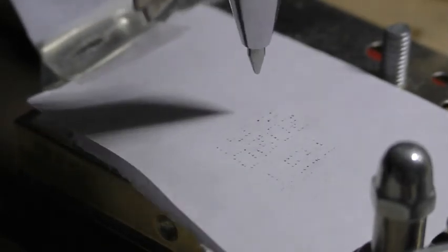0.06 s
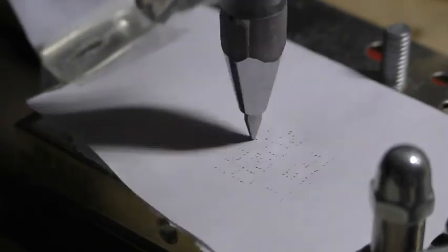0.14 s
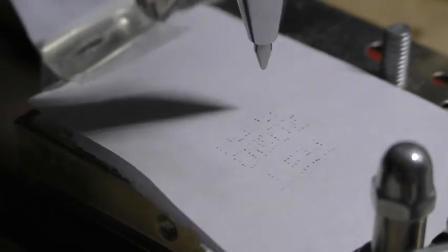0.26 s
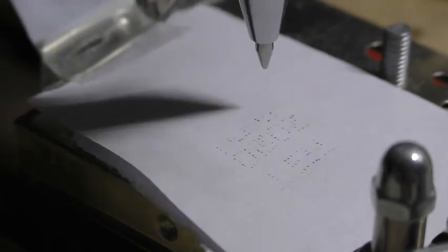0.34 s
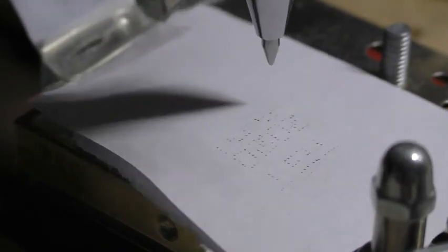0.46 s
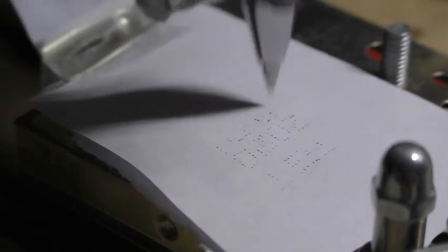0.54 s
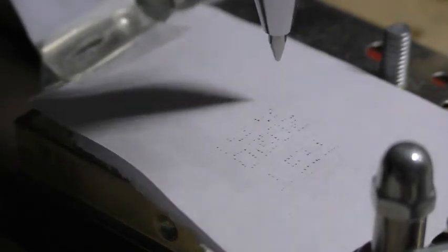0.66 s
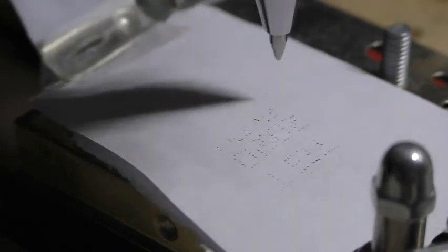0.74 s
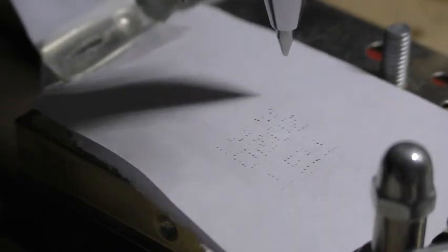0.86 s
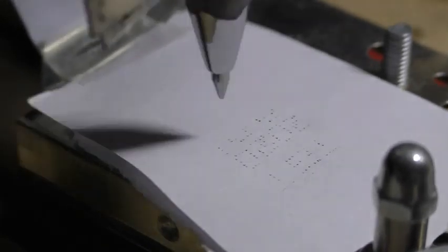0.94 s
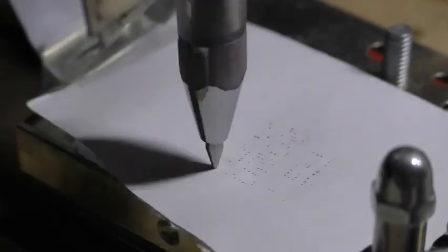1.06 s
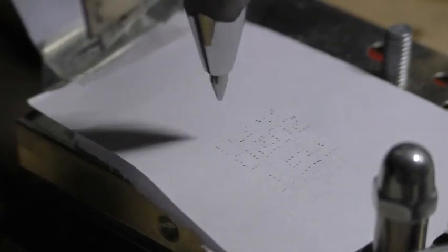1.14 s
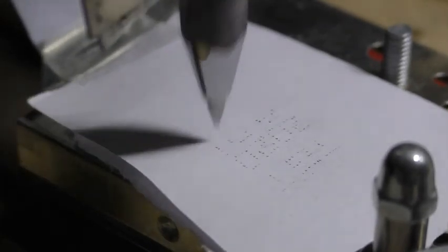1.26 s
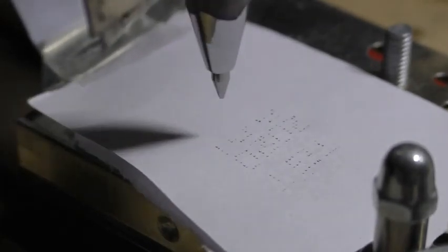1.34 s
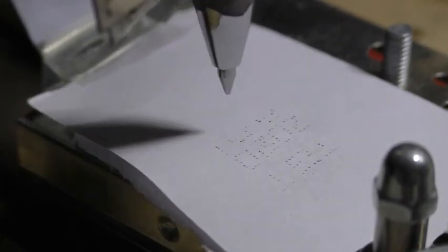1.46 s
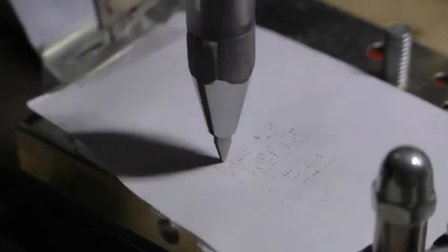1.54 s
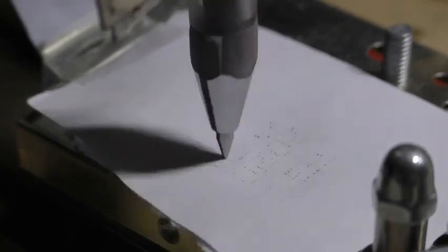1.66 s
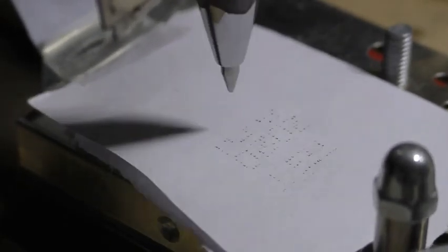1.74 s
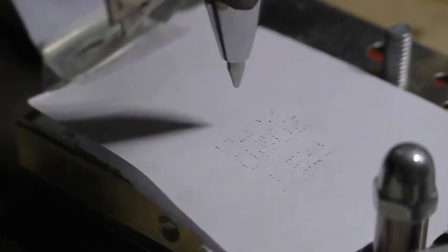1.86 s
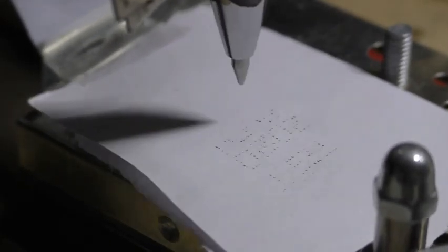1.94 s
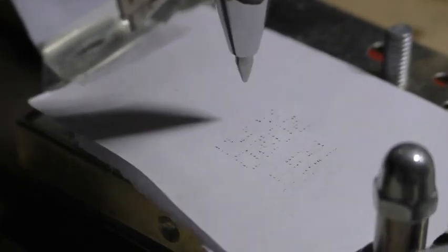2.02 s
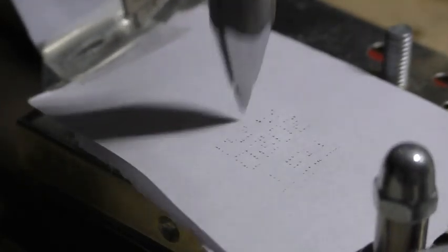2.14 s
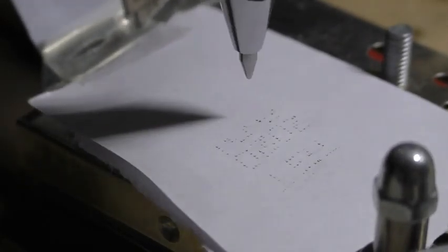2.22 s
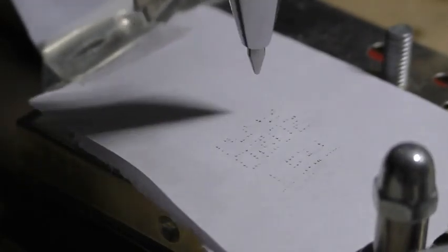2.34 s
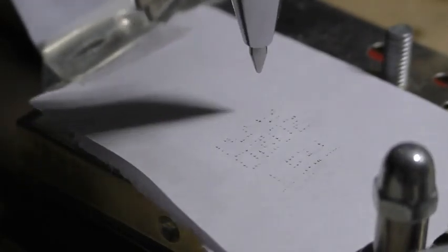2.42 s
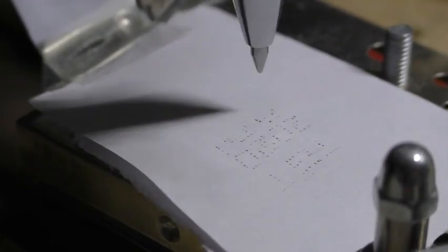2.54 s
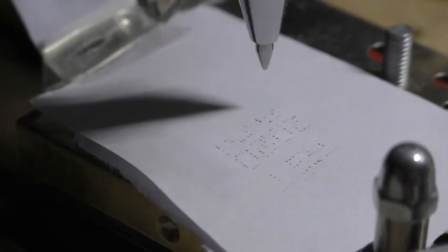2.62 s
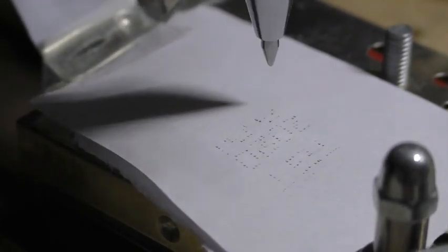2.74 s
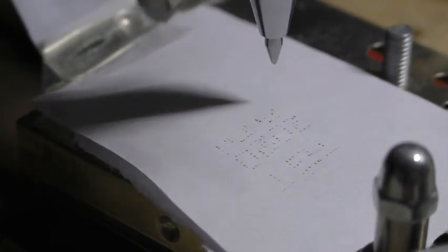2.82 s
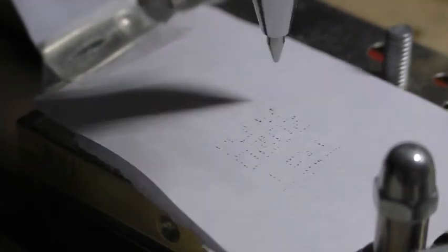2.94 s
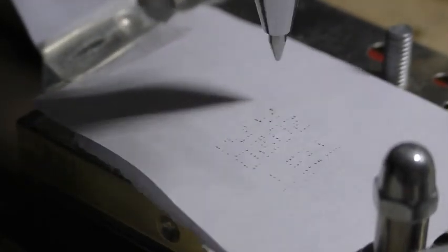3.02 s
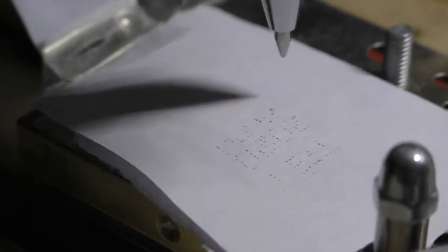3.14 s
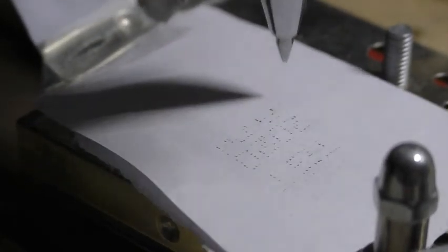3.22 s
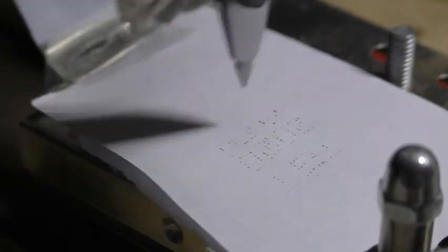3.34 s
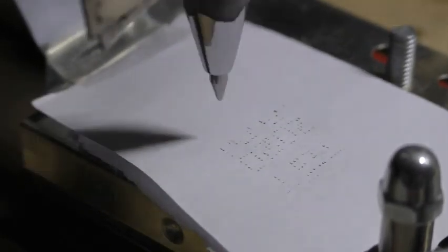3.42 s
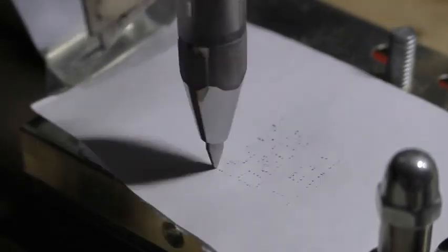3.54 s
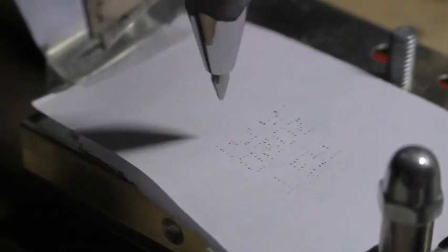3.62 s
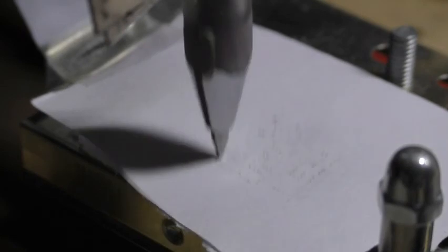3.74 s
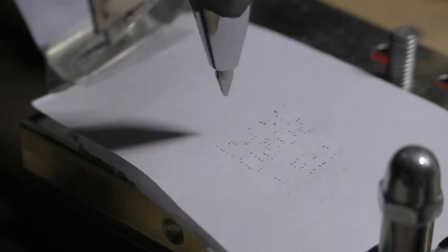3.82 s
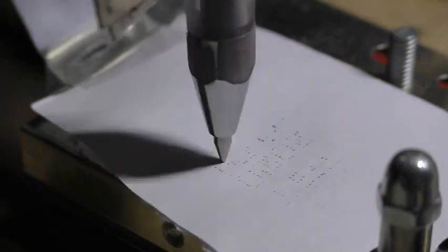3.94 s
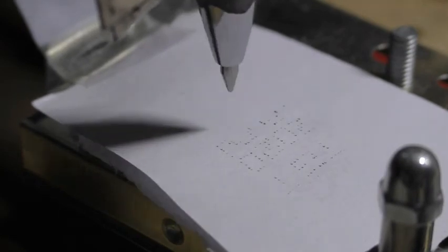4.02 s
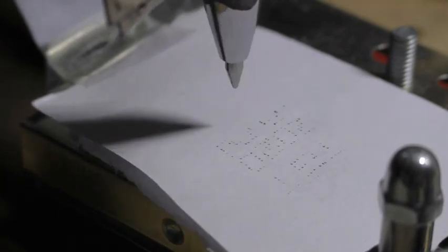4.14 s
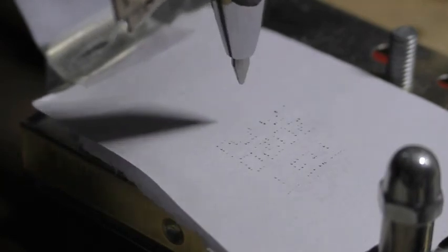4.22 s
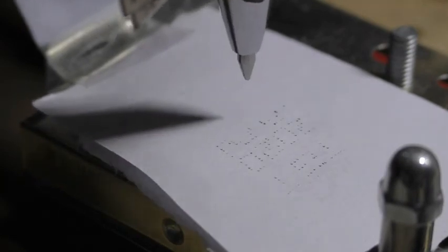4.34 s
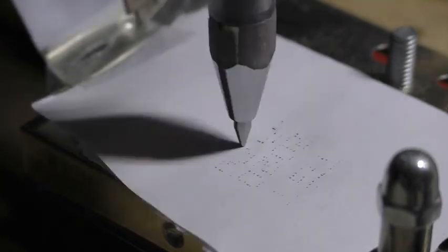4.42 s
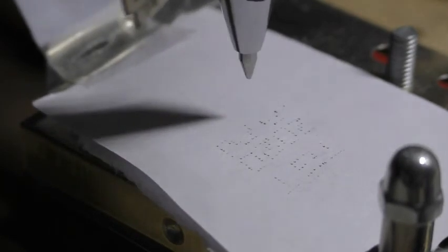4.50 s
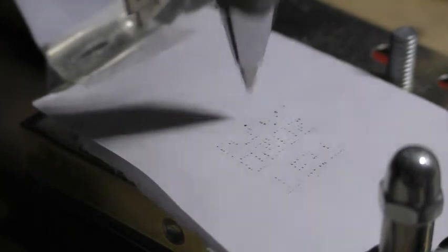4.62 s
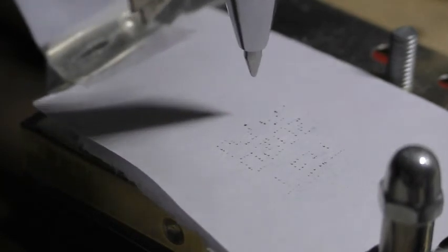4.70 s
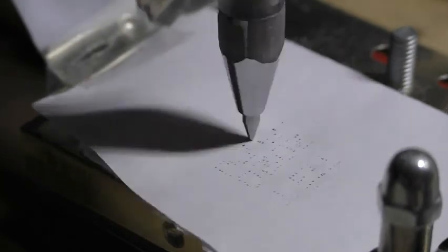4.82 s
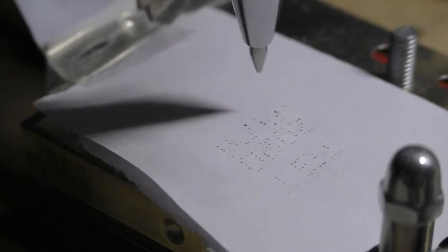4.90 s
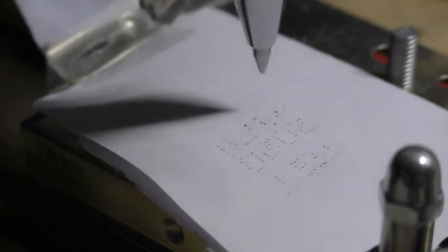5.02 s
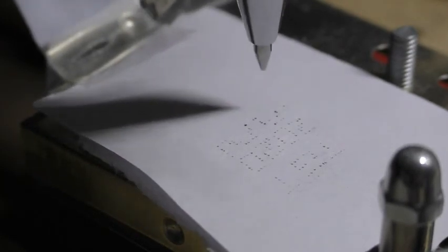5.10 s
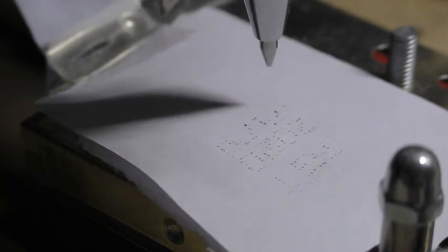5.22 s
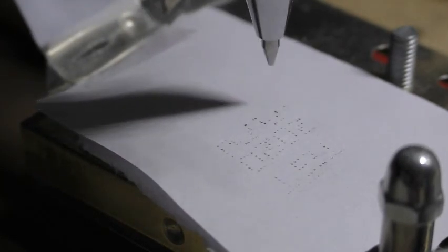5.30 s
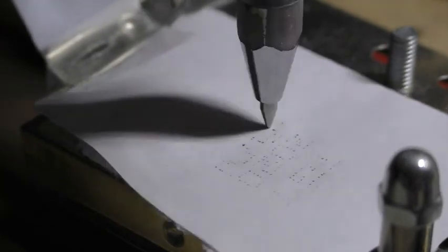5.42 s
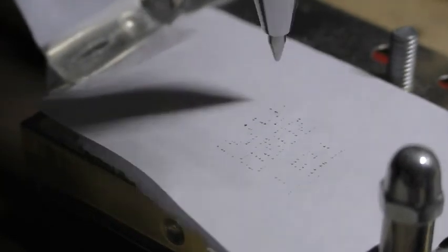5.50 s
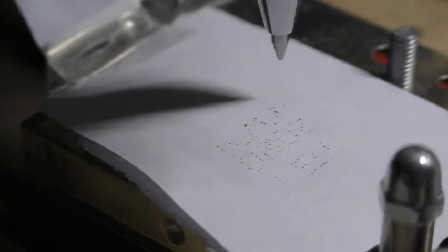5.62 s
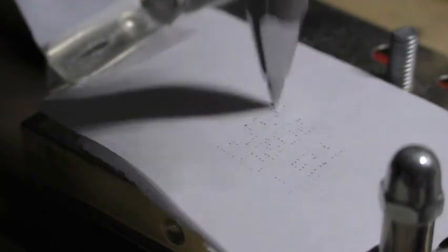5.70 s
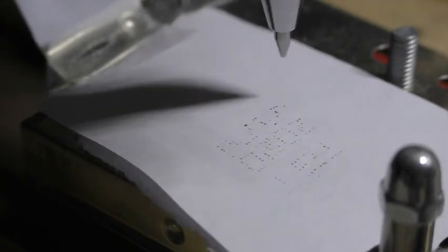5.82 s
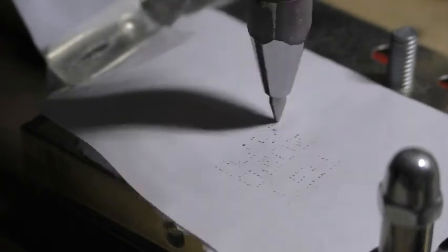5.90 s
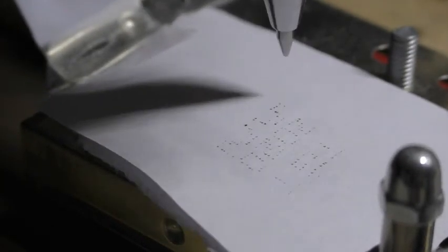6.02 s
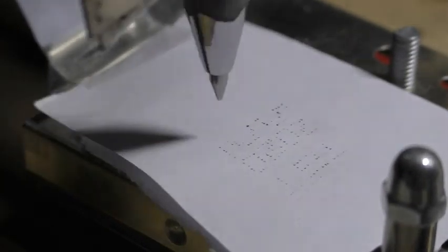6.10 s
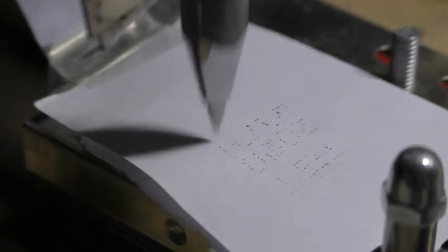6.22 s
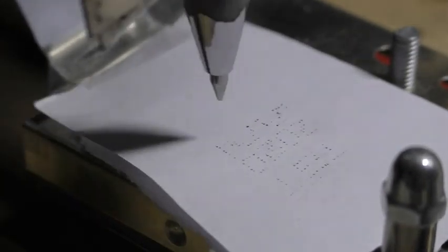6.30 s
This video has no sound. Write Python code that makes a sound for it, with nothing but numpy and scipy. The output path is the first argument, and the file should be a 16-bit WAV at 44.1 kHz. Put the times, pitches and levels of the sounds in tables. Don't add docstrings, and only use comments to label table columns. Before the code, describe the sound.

Close, dry gear chatter and sharp clicking knocks come in uneven bursts as a small machine taps a pen on paper in a quiet room.

```python
import sys
import numpy as np
from scipy import signal
from scipy.fft import rfft, irfft, next_fast_len
from scipy.io import wavfile
from scipy.ndimage import uniform_filter1d

SR = 44100
rng = np.random.default_rng(int(sys.argv[2]) if len(sys.argv) > 2 else 0)


def wrap_up_sound(samples):
    columns = np.atleast_2d(samples).T
    tamed = np.clip(columns, -1, 1)
    steps = np.round(tamed * 32767).astype(np.int16)
    wavfile.write(sys.argv[1], SR, steps)


def volts(x):
    e = np.asarray(x, float) / 20
    return 10 ** e


N = 280031
STROKE = 8192
FAINT_FULL_DB = -67

# frequency in Hz, width in Hz, level in dB.
PEN_MODES = [(1150, 250, -25), (1750, 300, -27), (2350, 250, -22), (2870, 280, -10), (3300, 250, -21),
             (3770, 180, -14), (4500, 170, -6), (5100, 170, -6), (5440, 200, 0), (5700, 140, -4),
             (6050, 200, -3), (6750, 170, -8), (7570, 400, -9), (8870, 500, -7), (9800, 900, -9),
             (11300, 1100, -11), (13100, 900, -14)]
# frequency in Hz, level in dB per Hz.
PEN_COLOUR = [(300, -50), (500, -36), (1000, -30), (2250, -24), (3990, -16), (5430, -3), (6440, -4),
              (9500, -4), (13400, -10), (14200, -17), (16000, -19)]
# frequency in Hz, width in Hz, level in dB.
NUDGE_MODES = [(1090, 90, -11), (1850, 170, -5), (3000, 300, -10), (3910, 150, 0), (4690, 200, -6),
               (6080, 250, -4), (6630, 200, -7), (8060, 200, -3)]
# frequency in Hz, level in dB per Hz.
TABLE_COLOUR = [(300, -55.5), (500, -33), (1000, -11.5), (2200, -14.5), (4000, -11), (5800, -14),
                (8000, -6.5), (11500, -0.5), (14000, -12), (16000, -19)]


def level(x, db):
    return x * volts(db) / np.sqrt(np.mean(x ** 2))


def shaped(x, gain):
    size = next_fast_len(len(x))
    hz = np.arange(size // 2 + 1) * SR / size + 1e-3
    return irfft(rfft(x, size) * gain(hz), size)[:len(x)]


def colour(x, points):
    hz, db = np.transpose(points)
    return shaped(x, lambda f: volts(np.interp(np.log(f), np.log(hz), db)))


def band(x, lo_hz, hi_hz):
    return level(shaped(x, lambda f: 1 / np.sqrt((1 + (lo_hz / f) ** 12) * (1 + (f / hi_hz) ** 12))), 0)


def walk(rate_hz, count=N):
    hold = int(SR / rate_hz)
    steps = np.repeat(rng.standard_normal(count // hold + 1), hold)
    return 1.6 * uniform_filter1d(uniform_filter1d(steps, hold), hold)[:count]


def ring(x, modes, widen, wander_db):
    out = 0
    for k, (hz, width_hz, db) in enumerate(modes):
        b, a = signal.iirpeak(hz, hz / (widen * width_hz), fs=SR)
        swell = volts(db + wander_db * walk(30, count=len(x)))
        mode = signal.lfilter(b, a, signal.lfilter(b, a, x))
        out = out + (-1) ** k * swell * mode
    return out


def teeth(strokes, rate_hz, scatter_db, contact_s, hiss_db):
    chance, force = rng.random((len(strokes) * STROKE, 2)).T
    meets = (chance < rate_hz / SR) * volts(scatter_db * (2 * force - 1))
    scrape = signal.lfilter([1], [1, -np.exp(-1 / (contact_s * SR))], meets)
    return rng.standard_normal(len(meets)) * (level(scrape, 0) + volts(hiss_db))


def case(x, modes, plain, widen, plain_db, wander_db):
    return level(ring(x, modes, widen, wander_db), 0) + level(colour(x, plain), plain_db)


def shape(times_s, dbs, mix_db=(), linger=(), full_db=0):
    dbs = np.array(dbs, float)
    relative_db = np.add(mix_db, np.outer(full_db - dbs, linger))
    return np.column_stack([np.cumsum(times_s), dbs, relative_db])


def gains(stroke, gate_s):
    s, main_db, *rel_db = np.transpose(stroke)
    t = s[0] + np.arange(STROKE) / SR
    gate = np.clip(np.minimum(t - s[0], s[-1] - t) / gate_s, 0, 1)
    bands_db = [np.interp(t, s, main_db + r) for r in [0 * s] + rel_db]
    return int(s[0] * SR), gate * volts(bands_db)


def servo(sound, strokes, gate_s=0.0085):
    low_hz, mid_hz, high_hz = 380, 3500, 7200
    ringing, chatter = band(sound, mid_hz, high_hz), band(sound, high_hz, SR)
    frame = band(sound, low_hz, mid_hz)
    shake = band(rng.standard_normal(len(sound)), 100, 268.6)
    layers = np.array([ringing, chatter, frame, shake])
    out = np.zeros(N + STROKE)
    for k, stroke in enumerate(strokes):
        i, gain = gains(stroke, gate_s)
        out[i:i + STROKE] += np.sum(gain * layers[:len(gain), k * STROKE:(k + 1) * STROKE], axis=0)
    return out[:N]


def pen_strokes():
    # start in seconds, drive in seconds, case ring in dB at first and at the end of the drive,
    # extra chatter in dB.
    jabs = [
        (1.236, .094, -30, -33, 1.5),
        (3.547, .132, -27.5, -28.5, -1.5),
        (4.597, .066, -29, -31.5, -1),
        (5.577, .087, -33, -42, 5),
        (6.279, .014, -51, -56, -2),
    ]
    # start in seconds, drive in seconds, case ring in dB,
    # extra chatter in dB, extra frame in dB.
    stops = [
        (1.586, .067, -32.5, 0.5, -2.5),
        (3.196, .064, -35.5, 7.5, 5),
        (3.888, .001, -32, 1.5, -12),
        (4.912, .031, -31.5, 1, -10),
        (5.853, .001, -39, 3.5, -9),
    ]
    spin_up_s, spin_up_db, gate_open_s, gate_shuts_db = .009, 10, .15, -71
    sag_db_per_s, brake_s, brake_db = 8, .011, 24
    mix_db = (0, -14.5, -18.5)
    linger = (.1, .26, .68)
    full_db = -27.5
    out = []
    for s, drive_s, db, end_db, chatter_db in jabs:
        times_s = s, spin_up_s, drive_s, gate_open_s - spin_up_s - drive_s
        dbs = db - spin_up_db, db, end_db, gate_shuts_db
        out.append(shape(times_s, dbs, np.add(mix_db, (chatter_db, 0, 0)), linger, full_db))
    for s, drive_s, db, chatter_db, frame_db in stops:
        end_db = db - sag_db_per_s * drive_s
        table_db = 8 * np.log10(drive_s / .04)
        times_s = s, spin_up_s, drive_s, brake_s
        dbs = db - spin_up_db, db, end_db, end_db - brake_db
        out.append(shape(times_s, dbs, np.add(mix_db, (chatter_db, frame_db, table_db)), linger, full_db))
    return out


def pen_servo():
    strokes = pen_strokes()
    clicks = teeth(strokes, 600, 4, .0003, 1)
    return servo(case(clicks, PEN_MODES, PEN_COLOUR, 1.0, -2.5, wander_db=3), strokes)


def knocks():
    # time in seconds, peak in dB, dull thud in dB relative.
    knock_table = [(1.2541, -14, -26.2), (1.2813, -15.5, -24), (1.305, -13, -33), (1.6008, -24, -28),
                   (1.6137, -16.5, -29), (1.6316, -15.5, -31), (1.6383, -16, -24), (1.6432, -12, -33),
                   (3.2111, -20, -25), (3.2212, -17, -26), (3.232, -22, -10), (3.245, -15, -24),
                   (3.2588, -18.5, -34), (3.5588, -13, -18), (3.5846, -15, -24), (3.612, -14.5, -21),
                   (3.6386, -15, -25), (3.897, -25, -57), (4.6095, -14, -34), (4.6198, -10.5, -27),
                   (4.6388, -7, -28), (4.651, -19, -29.5), (4.6616, -18.5, -28), (4.9222, -14, -42),
                   (4.951, -21, -33), (5.5908, -9, -28), (5.6044, -19, -20), (5.613, -16.5, -31.5),
                   (5.6427, -18, -27), (5.8616, -22, -40)]
    force, thud, t = np.zeros(N), np.zeros(N), np.arange(-130, 130) / SR
    bump = np.exp(-(t / np.where(t < 0, .0010, .0004)) ** 2)
    for s, db, thud_db in knock_table:
        i = int(s * SR) - len(t) // 2
        force[i:i + len(t)] += volts(db) * bump
        thud[i:i + len(t)] += volts(db + thud_db) * bump
    noise = rng.standard_normal(N)
    rattle = force * volts(-4) * band(colour(noise, PEN_COLOUR), 3800, 15500)
    ringing = volts(6.5) * ring(force * noise, PEN_MODES[5:], 1.3, wander_db=3.5)
    return rattle + ringing + volts(-3.5) * thud * band(noise, 920, 2200)


def thumps():
    # time in seconds, signed peak pressure (full scale 1), width in seconds.
    thump_table = [
        (3.567, 0.024, 0.0015),
        (4.641, 0.051, 0.0012),
        (5.593, 0.029, 0.0011),
        (1.256, 0.011, 0.0025),
        (1.638, -0.0084, .002),
        (1.001, -.015, 0.0015),
        (3.243, -0.011, 0.0019),
    ]
    out, t = np.zeros(N), np.arange(-400, 400) / SR
    for s, peak, width_s in thump_table:
        i = int(s * SR) - len(t) // 2
        out[i:i + len(t)] += peak * np.exp(-.5 * (t / width_s) ** 2)
    return out


def table_stroke(times_s, dbs, mix_db):
    return [shape(times_s, dbs, mix_db, (0.11, .05, .05), max(dbs))]


def table_shift():
    # Start, rise, drive, coast in seconds; case ring in dB at these moments; chatter, frame, table in dB.
    move = (0.957, .011, .061, .013), (-45, -40.6, -38.6, -56), (7.1, 1, 0.5)
    # frequency in Hz, width in Hz, level in dB.
    shift_modes = [(900, 60, -15), (1344, 24, 8.5), (3400, 90, -9), (3970, 70, -3), (4580, 50, -2),
                   (5420, 60, -9), (6680, 110, -7), (7910, 120, 0), (8340, 60, -3), (9630, 100, -2),
                   (10900, 120, -4), (11500, 250, -4), (13600, 200, -10)]
    strokes = table_stroke(*move)
    clicks = teeth(strokes, 1200, 3, .0003, 0)
    return servo(case(clicks, shift_modes, TABLE_COLOUR, 1.6, -2, wander_db=2), strokes)


def table_slide():
    # Start, rise, drive, coast in seconds; case ring in dB at these moments; chatter, frame, table in dB.
    move = (6.216, .021, .041, .01), (-80, -50.5, -47.5, -54), (6, -5, -20)
    # frequency in Hz, width in Hz, level in dB.
    slide_modes = [(1808, 54, -10.5), (2545, 30, -14.5), (2970, 50, -18), (3340, 42, -11.5),
                   (4590, 150, -18), (6510, 39, -2), (7550, 38, -6), (9080, 53, -4), (10000, 66, -10),
                   (11600, 91, -19)]
    strokes = table_stroke(*move)
    clicks = teeth(strokes, 900, 4, .0003, -3)
    return servo(case(clicks, slide_modes, TABLE_COLOUR, 2.2, 2, wander_db=2), strokes)


def table_settle():
    # Start, rise, drive, coast in seconds; case ring in dB at these moments; chatter, frame, table in dB.
    move = (3.405, 0.0083, .064, .012), (-63, -57, -74, -83), (-2, 3, 6)
    strokes = table_stroke(*move)
    clicks = teeth(strokes, 900, 3, .0004, 0)
    return servo(case(clicks, NUDGE_MODES, TABLE_COLOUR, 1.2, 3, wander_db=2), strokes)


def table_nudges():
    # start in seconds, rise in seconds, fall in seconds, case ring in dB at the top, extra frame in dB.
    nudge_table = [(0.0, .044, .076, -65, -0.5), (0.44, .014, .026, -73.5, -1), (0.875, .01, .01, -78, 0),
                   (0.93, 0.0047, 0.019, -70, 4), (1.865, 0.043, .004, -71, -3),
                   (1.933, .034, .075, -60, -1), (2.33, 0.016, 0.032, -74, 1), (2.39, .002, .058, -68, 3),
                   (2.77, .004, .016, -82, -8), (2.855, 0.016, 0.023, -70, -4), (4.22, .01, .015, -76, -2),
                   (4.256, 0.032, .03, -59.5, 3.5), (4.3, .028, .014, -61.5, 1), (5.239, .02, .04, -76, 10),
                   (5.275, .02, .014, -74, 5), (5.375, .002, .053, -80, 6.5), (6.14, .006, .01, -81, 0)]
    rise_db_per_s, fall_db_per_s = 332, 292
    strokes = []
    for s, rise_s, fall_s, db, frame_db in nudge_table:
        dbs = db - rise_db_per_s * rise_s, db, db - fall_db_per_s * fall_s
        mix_db = np.add((-2, -9.5), (0, frame_db))
        strokes.append(shape((s, rise_s, fall_s), dbs, mix_db, (0.42, 0.34), FAINT_FULL_DB))
    clicks = teeth(strokes, 700, 3, .0005, -2)
    return servo(case(clicks, NUDGE_MODES, TABLE_COLOUR, 1.0, 1, wander_db=2.5), strokes, gate_s=0.0028)


def pen_twitches():
    # start in seconds, length in seconds, case ring in dB, extra chatter in dB, extra frame in dB.
    twitch_table = [(0.19, 0.14, -68, 4, -4), (0.535, .035, -80, -6, 3), (0.61, 0.16, -71.5, 3, 4),
                    (1.105, 0.11, -72.5, 3.5, -3), (2.154, .065, -73.5, -2, 2.5),
                    (2.499, .13, -65.5, 1, -5), (2.919, .13, -63, -1, 1), (3.27, .076, -57, 2, 5),
                    (3.969, 0.12, -72, 2.5, 1), (4.462, .098, -72.5, 1, -2), (5.02, .13, -74.5, 0, 0),
                    (5.441, 0.072, -73, -5, 0.5), (5.875, .045, -73, 1, 5), (5.934, 0.067, -68.5, 1, 3)]
    rise_s, rise_db, fall_db_per_s = 0.0069, 5, 171
    strokes = []
    for s, length_s, db, *extra_db in twitch_table:
        dbs = db - rise_db, db, db - fall_db_per_s * length_s
        mix_db = np.add((0, -10.5), extra_db)
        strokes.append(shape((s, rise_s, length_s - rise_s), dbs, mix_db, (.1, .35), FAINT_FULL_DB))
    clicks = teeth(strokes, 800, 3, .0005, 0)
    return servo(case(clicks, PEN_MODES, TABLE_COLOUR, 1.3, 4, wander_db=2.5), strokes, gate_s=0.0018)


def scuffs():
    # start in seconds, length in seconds, level in dB.
    scuff_table = [
        (0.669, 0.098, -75),
        (5.93, .055, -80),
    ]
    rise_s, rise_db, fall_db = .016, 8, 13
    out, rub = np.zeros(N + STROKE), band(rng.standard_normal(N + STROKE), 340, 1700)
    for s, length_s, db in scuff_table:
        scuff = shape((s, rise_s, length_s - rise_s), (db - rise_db, db, db - fall_db))
        i, gain = gains(scuff, gate_s=0.0081)
        out[i:i + STROKE] += gain[0] * rub[i:i + STROKE]
    return out[:N]


def room_tone():
    # frequency in Hz, level in dB per Hz.
    quiet_colour = [(18, -40), (30, -19), (140, 0.5), (250, -1.5), (340, -16), (440, -40.5), (700, -39.5),
                    (1000, -37.5), (2800, -38), (4500, -41.5), (7090, -39.5), (10300, -24.5), (16000, -31)]
    # time in seconds, rumble in dB.
    rumble_path = [(0.0, -64.5), (0.56, -65), (0.72, -59.5), (0.85, -68.5), (0.97, -63), (1.34, -66),
                   (1.75, -63), (2.32, -64), (2.53, -65.5), (2.92, -61.5), (3.08, -64.5), (3.8, -65.5),
                   (4.4, -59.5), (4.69, -67), (5.06, -62), (5.8, -64), (5.92, -58), (6.35, -67)]
    # frequency in Hz, width in Hz, level in dB.
    idle_modes = [(1050, 43, -7.5), (1390, 59, -7.5), (1870, 150, -11), (2800, 74, -3), (3780, 27, -9.5),
                  (5050, 60, -15)]
    # time in seconds, holding effort in dB.
    idle_path = [(0.0, -87.5), (1.06, -90), (1.84, -83.5), (2.03, -92.5), (2.3, -92), (2.58, -89.5),
                 (2.69, -92.5), (3.29, -89.5), (3.43, -84), (3.48, -82), (3.66, -90), (4.01, -93),
                 (5.39, -87), (6.19, -88), (6.35, -81)]
    t = np.arange(N) / SR
    noise = colour(rng.standard_normal(N), quiet_colour)
    rumble = shaped(noise, lambda f: 1 / np.sqrt(1 + (f / 420) ** 12))
    hiss = (noise - rumble) / np.std(noise) * volts(-60.5 + .3 * walk(8.6))
    rumble_db = np.interp(t, *np.transpose(rumble_path)) + 2.2 * walk(22)
    idle = ring(rng.standard_normal(N), idle_modes, 1.9, wander_db=3.5)
    idle_db = np.interp(t, *np.transpose(idle_path))
    return level(rumble, 0) * volts(rumble_db) + hiss + level(idle, 4.3) * volts(idle_db)


def scene():
    pen = pen_servo() + knocks() + thumps() + pen_twitches()
    table = table_shift() + table_slide() + table_settle() + table_nudges()
    return (pen + table + scuffs() + room_tone())[None]


def roll_off(x):
    return signal.sosfilt(signal.butter(12, 16990, fs=SR, output="sos"), x)


def record(dry):
    soft = .42 * np.tanh(dry / .42)
    top_cut = signal.ellip(8, .2, 45, 15850, fs=SR, output="sos")
    return roll_off(signal.sosfilt(top_cut, soft))


dry = scene()
out = record(dry)
wrap_up_sound(out)
```